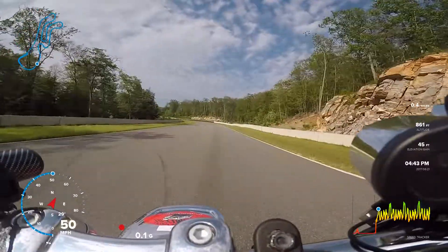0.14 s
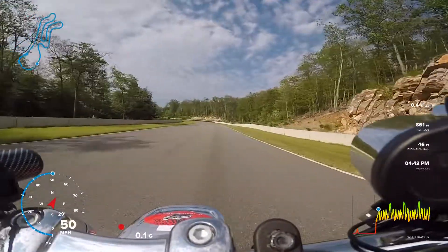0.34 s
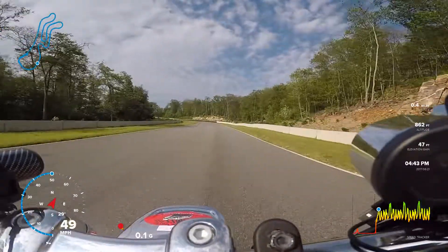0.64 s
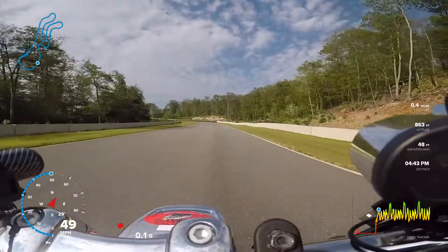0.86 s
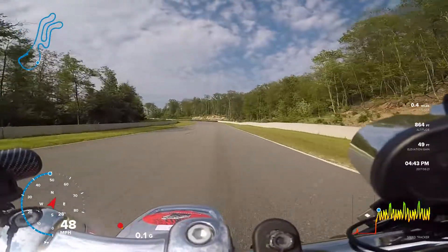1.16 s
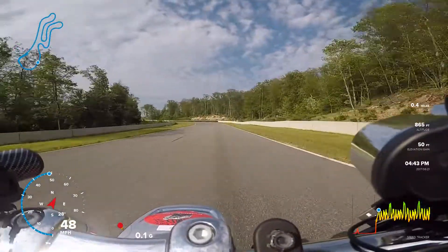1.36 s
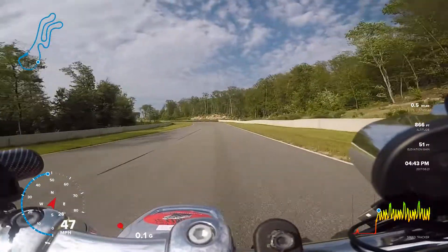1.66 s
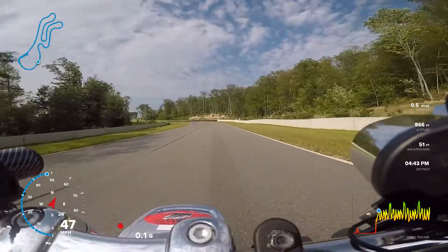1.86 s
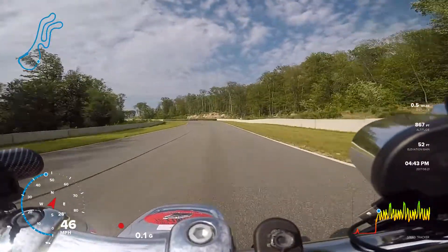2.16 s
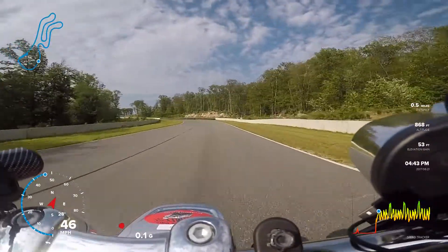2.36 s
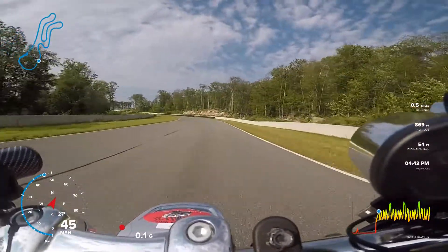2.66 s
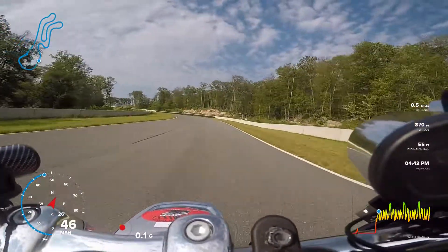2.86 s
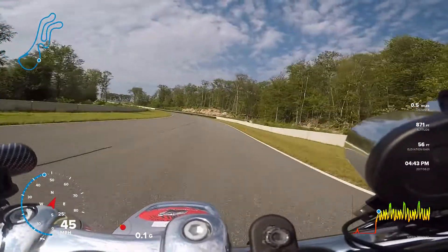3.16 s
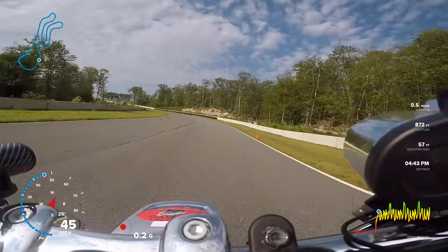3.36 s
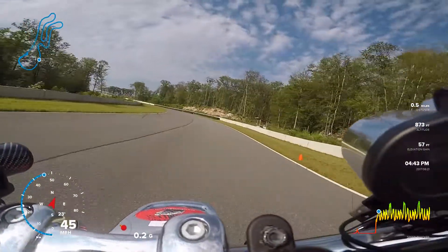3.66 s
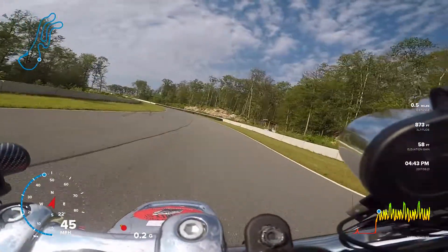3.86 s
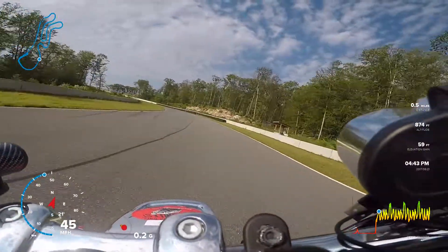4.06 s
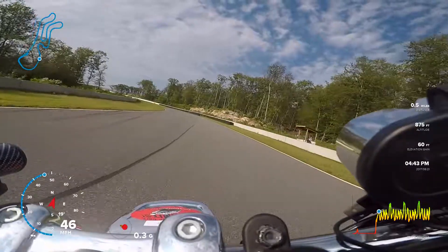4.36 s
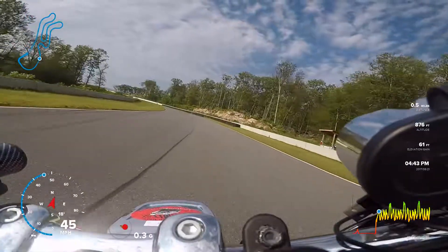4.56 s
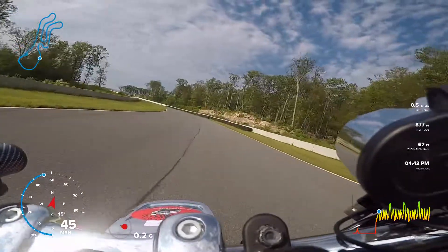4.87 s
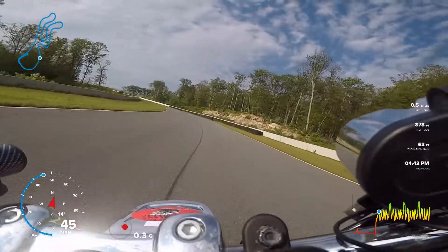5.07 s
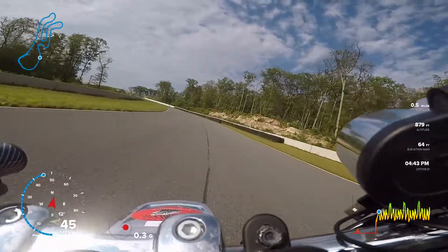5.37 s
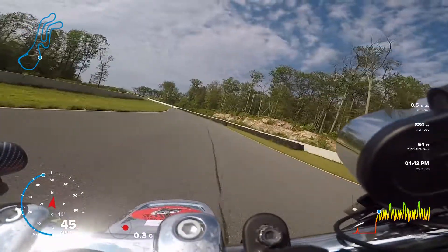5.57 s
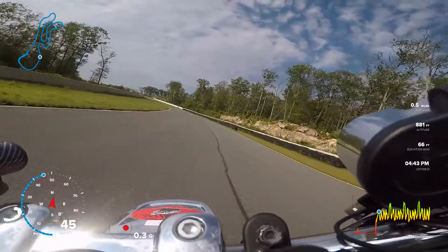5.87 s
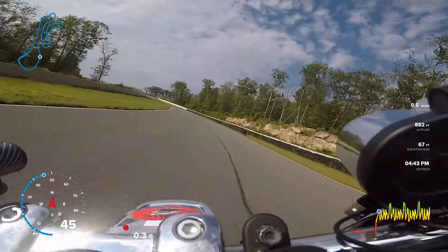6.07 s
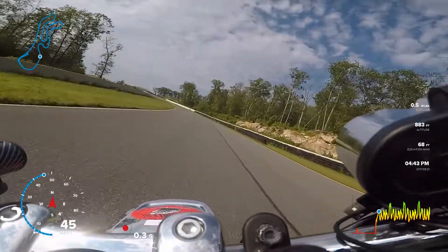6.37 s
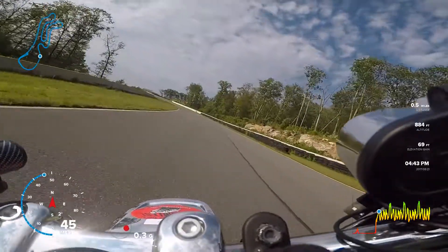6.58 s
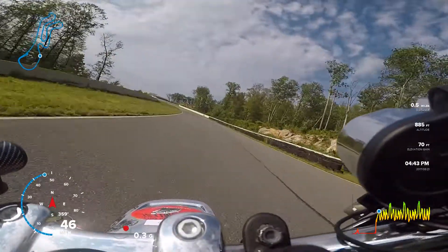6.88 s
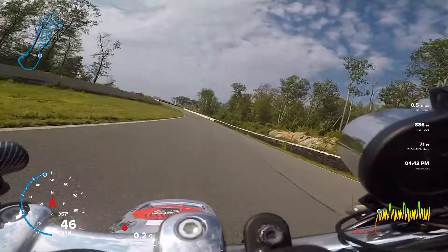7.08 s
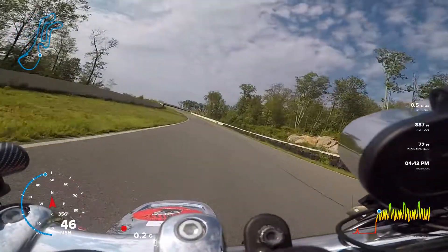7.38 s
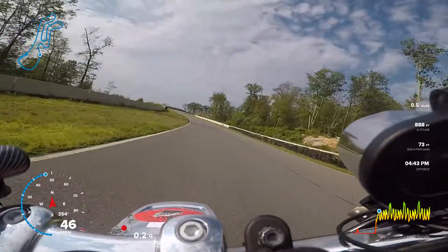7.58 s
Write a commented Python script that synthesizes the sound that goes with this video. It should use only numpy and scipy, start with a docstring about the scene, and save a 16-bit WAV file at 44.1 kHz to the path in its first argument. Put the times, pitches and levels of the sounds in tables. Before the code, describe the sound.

A twin-cylinder motorcycle coasts down, leans through a long bend with tyre hum swelling, then picks up slightly amid constant buffeting wind.

```python
"""An air-cooled V-twin motorcycle slows, leans through a long bend and picks up again, heard from the handlebar.
Its exhaust is a harmonic series on the firing cycle; the crank adds a once-a-turn shake.
The tread hums at the block rate, louder as the bike leans, and breaks into groans on a tar seam.
The primary drive whines and whirs among a roar and a hollow ring that throb with the firings.
Wind is shaped noise: it buffets the microphone, rushes round the bike and whistles past an edge."""
import sys
import numpy as np
from scipy import signal
from scipy.fft import rfft, irfft, next_fast_len
from scipy.io import wavfile
from scipy.ndimage import uniform_filter1d, minimum_filter1d, map_coordinates

SR = 44100
rng = np.random.default_rng(int(sys.argv[2]) if len(sys.argv) > 2 else 0)


def bounce(signal):
    """Save signal as a 16-bit WAV file at the path given by the first command-line argument."""
    frames = np.transpose(np.atleast_2d(signal))
    limited = np.clip(frames, -1, 1)
    pcm = np.round(limited * 32767).astype(np.int16)
    wavfile.write(sys.argv[1], SR, pcm)


N = 340893

# Gusts and lulls of the air stream: [centre t/s, length/s, rise level/dB,
# extra hollow-ring level/dB, extra fizz level/dB]
GUSTS = [(0, 1.2, 1, -8, -0.5), (1.3, 0.56, -0.5, 1, -0.5), (2.1, 0.9, 1.9, 0.5, -2),
         (2.85, 1.06, 3, -2.5, 0), (3.62, 1.03, 2, 0.3, -0.5), (5.65, 1.85, -2, -2, 1.7),
         (6.45, 0.69, 0, 1.5, 3), (6.9, 1.89, 3, 0.5, 0)]
# Short puffs of air: [centre t/s, length/s, rise level/dB]
PUFFS = [(.42, 0.24, 0.8), (1.07, 0.13, 1.6), (2.12, 0.19, 0.5), (2.74, 0.12, 1.5), (2.98, .16, 0.2),
         (3.36, .14, 1), (3.85, .14, 1.2), (4.56, .12, 0.5), (6.08, .12, 1.2), (6.44, .14, 1),
         (6.72, .14, 1)]
# Relative spectra of the wind noises, low to high: [f/Hz, level/dB per Hz]
BUFFET_SPECTRUM = [(10, -32), (23, -19.5), (35, -3), (50, -5.5), (64, -2), (85, -4), (118, -4.5), (136, -4),
                   (156, -10.5), (190, -19), (230, -16.5), (300, -34.5), (900, -120)]
RUSH_SPECTRUM = [(100, -80.5), (700, -2.5), (850, -1), (950, -4), (1030, 1.5), (1110, 0.5), (1155, 6),
                 (1215, 4.5), (1290, -2.5), (1420, 2), (1580, 0), (1790, -6.5), (1900, -5.5), (2300, -17.5),
                 (3300, -27.5), (5000, -50), (10000, -110)]
HISS_SPECTRUM = [(1200, -27), (1900, -1.5), (2250, -3), (2480, 1), (2700, -2.5), (3550, -1.5), (3950, -5.5),
                 (4600, -12), (6000, -35.5), (10000, -82)]
FIZZ_SPECTRUM = [(2000, -33.5), (3500, -14.5), (4300, -2), (4800, 0.5), (5600, -1), (6200, -1.5),
                 (6600, -2.5), (7100, -8.5), (8000, -15), (9000, -22), (10000, -35)]
# Wandering low boom in the buffeting: [t/s, f/Hz, level/dB]
BOOM = [(0, 135.2, -29.5), (.25, 132.1, -26), (.42, 122.6, -26), (.75, 119, -29.5), (1, 116, -23),
        (1.25, 112.2, -24), (1.33, 111.5, -37), (1.5, 109.5, -24.5), (1.66, 106.4, -33.5),
        (1.8, 105.4, -19.5), (1.95, 100, -42), (2.25, 125, -25.5), (2.45, 99, -32), (2.65, 114.3, -26),
        (2.85, 124.2, -22), (3.05, 131, -34.5), (3.35, 72, -23.5), (3.6, 107.8, -36.5), (3.9, 130.3, -34.5),
        (5.2, 118.3, -32), (6.1, 110, -34), (6.75, 100.4, -27.5), (7.28, 111.8, -31.5), (7.4, 120.4, -22),
        (7.52, 124, -34), (7.73, 125.5, -31)]
# Relative spectra of the roar, hollow ring and whirr: [f/Hz, level/dB per Hz]
ROAR_SPECTRUM = [(50, -82.5), (150, -25.5), (215, 1), (250, -1), (330, 0.5), (430, -2), (540, 0),
                 (600, -2.5), (800, -15.5), (1200, -59), (3000, -120)]
HOLLOW_SPECTRUM = [(300, -120), (520, -35), (595, -13), (625, 2), (685, -1.5), (740, -0.5), (785, -5.5),
                   (815, -15.5), (950, -64.5), (1500, -120)]
WHIRR_SPECTRUM = [(1100, -120), (1520, -31), (1610, -16), (1635, 2), (1680, 2), (1718, 4), (1742, -6),
                  (1775, -20.5), (1900, -46), (2500, -120)]
# Wandering resonance in the hollow ring: [t/s, f/Hz, level/dB before a fixed cut]
HOWL = [(0, 657, -39), (.5, 714, -32.5), (.8, 715, -41), (1.05, 694, -33), (1.4, 700, -35.5),
        (2.2, 680, -32), (2.5, 707, -34.5), (2.75, 692.3, -29.5), (2.95, 675.4, -35.5), (3.35, 660, -34.5),
        (3.53, 651, -26.5), (3.82, 661, -27), (3.92, 663.6, -36), (4.3, 673.7, -31), (5.3, 682.6, -36),
        (6.05, 670, -38.5), (6.22, 664, -30.5), (6.4, 668.6, -38), (7.05, 675, -27), (7.35, 660, -36.5),
        (7.73, 688, -31)]
# Common level of the primary drive's whirr and tones: [t/s, level/dB]
WHIRR_LEVEL = [(0, -41), (1.6, -44.5), (2.1, -41), (2.6, -36), (3.2, -38), (4.1, -39), (4.4, -41.5),
               (5, -38.5), (5.5, -41.5), (6.05, -39), (6.45, -35.5), (6.9, -38.5), (7.3, -42.5),
               (7.7, -41.5)]
# Primary drive tones: [multiple of the crank rate, level/dB at the case resonance re whirr level]
DRIVE_TONES = [(33, -5), (34, -5.5), (35, -12.5)]
# Rate of tread blocks on the road, the pitch of the hum: [t/s, f/Hz]
TREAD_RATE = [(0, 220), (.7, 219.5), (1.3, 214.5), (2, 209), (2.5, 204.2), (3, 201.7), (3.5, 200.9),
              (4, 201.8), (4.5, 202.2), (5.2, 201.3), (5.8, 200.8), (6.3, 202.3), (7, 203.4), (7.73, 205)]
# Tread hum, which grows with the lean, and its octave: [t/s, level/dB]
HUM_LEVEL = [(0, -57), (1.3, -43.5), (1.75, -33.5), (2.1, -27), (2.75, -30), (2.95, -26.5), (3.2, -23.5),
             (3.5, -27), (3.75, -18.5), (4.05, -17), (4.4, -17.5), (5, -15), (5.3, -16), (5.85, -20.5),
             (6.05, -19), (6.35, -25), (7.1, -21), (7.35, -26.5), (7.7, -22.5)]
OCTAVE_LEVEL = [(0, -57), (2.6, -49), (3.9, -42.5), (4.5, -39.5), (5.2, -36.5), (6.2, -37), (7.2, -35),
                (7.7, -50)]
# Spans in which the hum breaks up on the seam: [start t/s, end t/s]
SEAM_SPANS = [(5.04, 5.115), (5.315, 5.775)]
# Relative spectrum of the formless tyre flutter: [f/Hz, level/dB per Hz]
FLUTTER_SPECTRUM = [(60, -86.5), (100, -25.5), (135, -4), (155, -4.5), (190, 5.5), (225, 7.5), (242, -19),
                    (280, -45), (500, -120)]
# Groans of the tyre slipping and catching: [centre t/s, length/s, centre f/Hz, glide/Hz per s, level/dB]
SLIPS = [(5.064, .085, 161.6, 0, -14.5), (5.101, .08, 222, 0, -22.5), (5.322, .07, 188.6, -350, -15),
         (5.368, .07, 133.1, 0, -23.5), (5.352, 0.07, 225, 0, -20), (5.387, .07, 211.4, 0, -16),
         (5.41, 0.06, 169, -200, -19.5), (5.456, 0.093, 153, 250, -16), (5.44, 0.034, 222, 0, -21),
         (5.485, 0.038, 182, 300, -22), (5.518, 0.055, 197.5, 0, -16), (5.547, 0.061, 223, 2, -21),
         (5.572, 0.1, 180, -150, -14.5), (5.664, 0.15, 152.5, -1, -18.5), (5.695, 0.11, 211.3, 0, -23.5),
         (5.758, 0.16, 161.5, -100, -21.5)]
# Crankshaft rotation rate: [t/s, f/Hz]
CRANK_RATE = [(0, 54), (.45, 54), (.75, 53.5), (1.1, 53), (1.7, 51.3), (2.4, 50.15), (2.8, 49.75),
              (3.4, 49.45), (4, 49.7), (4.5, 49.8), (5.5, 49.45), (6.5, 49.95), (7.1, 50.35), (7.73, 50.6)]
# Throttle opening: [t/s, opening 0-1]
THROTTLE = [(0, 0.03), (2.2, 0.06), (3, 0.77), (4, 1), (7.7, 1)]
# Once-a-turn shake of the engine: [t/s, level/dB]
SHAKE_LEVEL = [(0, -24), (1.58, -21.5), (1.72, -30), (2.35, -25.5), (2.6, -25.5), (2.85, -31), (3.08, -23),
               (3.3, -36), (3.72, -26), (4.05, -30), (4.2, -27.5), (4.4, -29), (4.58, -27), (5.02, -39),
               (5.18, -23.5), (5.5, -39), (5.93, -25), (6.1, -33), (6.3, -28), (6.65, -30.5), (7.28, -22),
               (7.7, -21)]
# Exhaust lines: [harmonic of the two-turn firing cycle, coasting level/dB, full-throttle level/dB]
EXHAUST_LINES = [(1, -41, -39.5), (3, -35.5, -38), (4, -32.5, -34), (5, -34, -35.5), (6, -39, -28.5),
                 (7, -40.5, -30.5), (9, -48.5, -44.5), (10, -40.5, -47.5), (11, -44, -49.5),
                 (12, -45, -53.5), (13, -44.5, -48.5), (14, -47, -57.5), (15, -50.5, -48), (25, -56, -44.5),
                 (27, -46, -43.5), (29, -45.5, -53.5), (31, -57, -45)]
# Narrow resonances lifting a passing exhaust line: [f/Hz, width/Hz, peak lift/dB]
PIPES = [(297.2, 2.5, 10.5), (329, 2.6, 7.5)]

BUFFET_DB, SHELTER_DB = -23.5, 5.5  # upright level; its own drop at full lean
HUM_DUCK_DB = 1  # dip shared by the air-driven layers while the hum is loudest
BOOM_WIDTH_HZ, HOWL_WIDTH_HZ = 7, 32  # rates of fluctuation
EDGE_HZ, EDGE_WIDTH_HZ, EDGE_DB = 6550, 160, -59.5  # level at full lean
CASE_HZ, CASE_WIDTH_HZ = 1725, 87  # band in which the case lets the drive's tones out
BLOCKS_PER_SWELL, SWELL_DB = 12, 0.9  # the hum swells slightly once every 12 tread blocks
SEAM_FADE_S = 0.044
FLUTTER_SHARE, GRAIN_SHARE = 0.18, 0.035  # flutter power added on the seam; from asphalt grain
TOP_HZ = 10200


def amp(db):
    """Decibels are a logarithmic measure of amplitude gain."""
    return 10 ** (np.asarray(db) / 20)


def unit(x):
    """Normalisation sets the root-mean-square value to 1."""
    return x / np.sqrt(np.mean(x ** 2) + 1e-20)


def curves(rows):
    """Linear interpolation gives one value per sample for each column after t/s."""
    seconds, *columns = np.transpose(rows)
    return [np.interp(np.arange(N) / SR, seconds, column) for column in columns]


def wobble(rate_hz):
    """Spline interpolation of random knots gives a slow, smooth fluctuation."""
    knots = rng.standard_normal(int(N * rate_hz / SR) + 4)
    return map_coordinates(knots, [np.arange(N) * rate_hz / SR])


def filtered(x, response):
    """Linear filtering multiplies the spectrum by a frequency response."""
    size = next_fast_len(N + SR // 2)  # padding
    spectrum = rfft(x, size) * response(np.fft.rfftfreq(size, 1 / SR))
    return irfft(spectrum, size)[:N]


def noise(spectrum):
    """Spectral shaping colours white noise, interpolating decibels on log frequency."""
    f, db = np.transpose(spectrum)

    def response(hz):
        return amp(np.interp(np.log(hz + 1), np.log(f + 1), db))

    return unit(filtered(rng.standard_normal(N), response))


def tone(turns, waver_db, jitter_rad):
    """Amplitude and phase modulation broaden a sinusoid that follows accumulated turns."""
    phase = 2 * np.pi * (turns + rng.random()) + jitter_rad * wobble(12)
    return unit(amp(waver_db * wobble(14)) * np.sin(phase))


def levelled(x, seconds, strength):
    """Envelope compression divides out part of the short-term power."""
    envelope_power = np.abs(signal.hilbert(x)) ** 2
    power = np.abs(uniform_filter1d(envelope_power, max(int(seconds * SR), 1)))
    return unit(x / (power + 1e-3) ** (strength / 2))


def resonance(hz, centre_hz, width_hz):
    """A Lorentzian response is 1 at its centre and a half one width away."""
    return 1 / (1 + ((hz - centre_hz) / width_hz) ** 2)


def band(rows, width_hz, strength):
    """A random complex envelope widens a gliding carrier; strength evens out its swells."""
    hz, db = curves(rows)
    envelope = wobble(2 * width_hz) + 1j * wobble(2 * width_hz)
    envelope = envelope / (np.abs(envelope) + .1) ** strength
    carrier = np.exp(2j * np.pi * np.cumsum(hz) / SR)
    return amp(db) * unit(np.real(envelope * carrier))


def swells(rows):
    """Superposed cosine-squared pulses give one curve for each height column."""
    t = np.arange(0, N / SR, .002)
    total = 0
    for centre, length, *heights in rows:
        pulse = np.cos(np.pi * np.clip((t - centre) / length, -.5, .5)) ** 2
        total = total + np.outer(pulse, heights)
    return curves(np.column_stack([t, total]))


def lean():
    """Tread-hum power, relative to its maximum, serves as the lean from 0 to 1."""
    hum_db, = curves(HUM_LEVEL)
    return amp(hum_db - hum_db.max()) ** 2


def driven(db, follows, throttle_db):
    """Gain follows the air stream (dB per dB), dips under a loud hum and changes with throttle."""
    hum_power = lean()
    air_db = swells(GUSTS)[0] + swells(PUFFS)[0] - HUM_DUCK_DB * hum_power
    throttle, = curves(THROTTLE)
    return amp(db + follows * air_db + throttle_db * throttle)


def firing(turns, depth):
    """Periodic modulation has two uneven puffs per cycle, from cylinders 45 degrees apart."""
    second = 315 / 720  # fraction of the two-turn cycle
    puffs = 0
    for lag in (0, second):
        puffs = puffs + np.exp(6 * (np.cos(2 * np.pi * (turns / 2 - lag)) - 1))
    return unit(1 + depth * puffs)


def edge_whistle():
    """Flow past an edge is a narrow band of noise that grows with the lean."""
    jet = filtered(rng.standard_normal(N), lambda hz: resonance(hz, EDGE_HZ, EDGE_WIDTH_HZ))
    return amp(EDGE_DB) * lean() ** .25 * unit(jet)


def wind(turns):
    """Turbulent eddies buffet the microphone; rush, hiss and fizz throb faintly with the firings."""
    _, _, fizz_db = swells(GUSTS)
    eddies = levelled(noise(BUFFET_SPECTRUM), seconds=0.025, strength=0.42) * amp(1.1 * wobble(9))
    buffet = driven(db=BUFFET_DB - SHELTER_DB * lean(), follows=0.87, throttle_db=0.0) * eddies
    boom = band(BOOM, BOOM_WIDTH_HZ, strength=1.0)
    rush = driven(db=-34.0, follows=.75, throttle_db=-0.5) * amp(0.56 * wobble(25)) * noise(RUSH_SPECTRUM)
    hiss = driven(db=-45, follows=1.05, throttle_db=0.57) * amp(.4 * wobble(25)) * noise(HISS_SPECTRUM)
    fizz = driven(db=-53.0, follows=0.86, throttle_db=3.0) * amp(fizz_db) * noise(FIZZ_SPECTRUM)
    stream = (rush + hiss + fizz) * firing(turns, depth=0.14)
    return buffet + boom + edge_whistle() + stream


def primary_drive(turns):
    """Case resonance weights tones at multiples of the crank rate over a whirr of noise."""
    crank_hz, = curves(CRANK_RATE)
    whirr_db, = curves(WHIRR_LEVEL)
    teeth = 0
    for order, db in DRIVE_TONES:
        gain = amp(db) * resonance(order * crank_hz, CASE_HZ, CASE_WIDTH_HZ)
        teeth = teeth + gain * tone(order * turns, waver_db=0.0, jitter_rad=0.2)
    return amp(whirr_db) * (amp(-2.0) * noise(WHIRR_SPECTRUM) + teeth)


def machinery(turns):
    """Amplitude modulation by the firings makes roar, hollow ring and drive throb together."""
    _, hollow_db, _ = swells(GUSTS)
    roar = driven(db=-33.0, follows=1.26, throttle_db=1) * noise(ROAR_SPECTRUM)
    hollow_gain = driven(db=-38.5, follows=1.2, throttle_db=4.0) * amp(hollow_db + .5 * wobble(30))
    hollow = hollow_gain * noise(HOLLOW_SPECTRUM)
    howl = amp(-4) * band(HOWL, HOWL_WIDTH_HZ, strength=0.088)
    return (roar + hollow + howl + primary_drive(turns)) * firing(turns, depth=0.33)


def slips():
    """Stick-slip on the seam is a set of brief gliding groans."""
    t = np.arange(N) / SR
    out = np.zeros(N)
    for centre, length, hz, glide, db in SLIPS:
        inside = np.abs(t - centre) < length / 2
        u = t[inside] - centre
        envelope = np.sqrt(2) * amp(db) * np.cos(np.pi * u / length)
        cycles = rng.random() + hz * u + glide * u ** 2 / 2
        out[inside] += envelope * np.sin(2 * np.pi * cycles)
    return out


def seam_contact():
    """Linear crossfades raise the seam's influence from 0 to 1 and back."""
    t = np.arange(N) / SR
    broken = 0
    for start, end in SEAM_SPANS:
        broken = broken + np.clip(np.minimum(t - start, end - t) / SEAM_FADE_S + .5, 0, 1)
    return np.clip(broken, 0, 1)


def tyre():
    """Periodic block impacts make a hum; the seam breaks it into flutter and separate groans."""
    hum_db, = curves(HUM_LEVEL)
    octave_db, = curves(OCTAVE_LEVEL)
    broken = seam_contact()
    blocks = np.cumsum(curves(TREAD_RATE)[0]) / SR
    steady = tone(blocks, waver_db=1.53, jitter_rad=0.081)
    flutter = levelled(noise(FLUTTER_SPECTRUM), seconds=0.025, strength=0.66)
    hum = (1 - broken) * np.sqrt(1 - GRAIN_SHARE) * steady
    hum += np.sqrt(GRAIN_SHARE + FLUTTER_SHARE * broken) * flutter
    swell_db = SWELL_DB * np.sin(2 * np.pi * blocks / BLOCKS_PER_SWELL)
    octave = amp(octave_db) * tone(2 * blocks, waver_db=0.8, jitter_rad=0.05)
    return amp(hum_db + swell_db) * hum + slips() + octave


def engine(turns):
    """Harmonics of the firing cycle change balance with throttle; the crank shakes the frame."""
    crank_hz, = curves(CRANK_RATE)
    throttle, = curves(THROTTLE)
    shake_db, = curves(SHAKE_LEVEL)
    out = amp(shake_db) * tone(turns, waver_db=0.1, jitter_rad=0.06)
    for order, coast_db, pull_db in EXHAUST_LINES:
        per_turn = order / 2  # a firing cycle lasts two turns
        pipe_db = sum(db * resonance(per_turn * crank_hz, hz, width) for hz, width, db in PIPES)
        line_db = coast_db + (pull_db - coast_db) * throttle + pipe_db
        out += amp(line_db) * tone(per_turn * turns, waver_db=2.5, jitter_rad=0.44)
    return out


def scene():
    """Superposition adds the sources; the crank's accumulated turns time the firings."""
    turns = np.cumsum(curves(CRANK_RATE)[0]) / SR
    return (wind(turns) + machinery(turns) + tyre() + engine(turns))[None]


def limited(x, ceiling_db, knee, size):
    """Look-ahead gain reduction with a soft knee holds peaks under the ceiling."""
    needed_gain = (1 + np.abs(x / amp(ceiling_db)) ** knee) ** (-1 / knee)
    return x * uniform_filter1d(minimum_filter1d(needed_gain, size), size)


def record(dry):
    """Peak limiting precedes a sharp low-pass that removes everything above the band limit."""
    held = limited(amp(0.6) * dry[0], ceiling_db=-8.5, knee=4.5, size=400)  # size in samples
    return filtered(held, lambda hz: hz < TOP_HZ)[None]


dry = scene()
out = record(dry)
bounce(out)
```